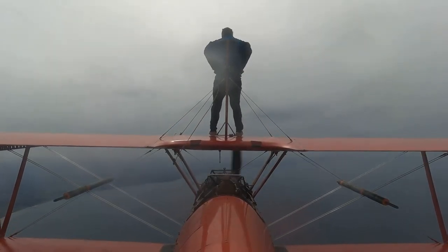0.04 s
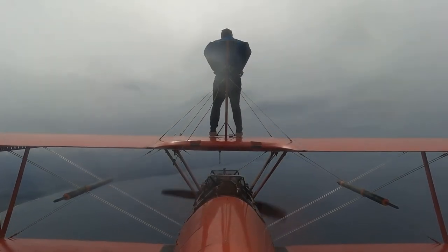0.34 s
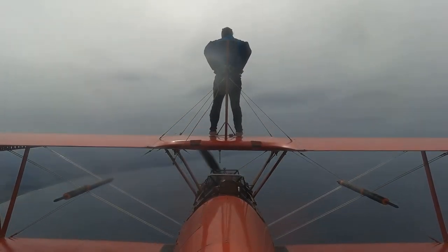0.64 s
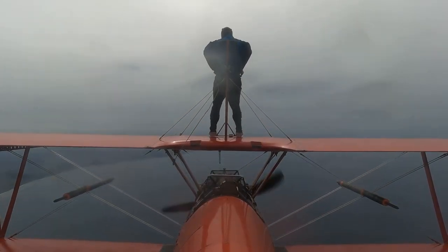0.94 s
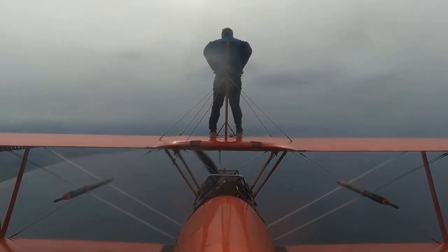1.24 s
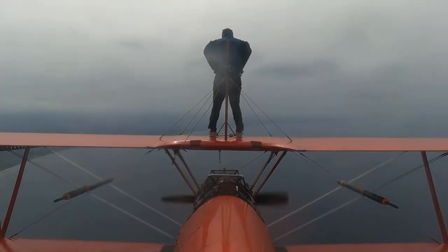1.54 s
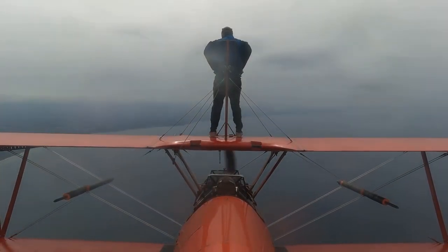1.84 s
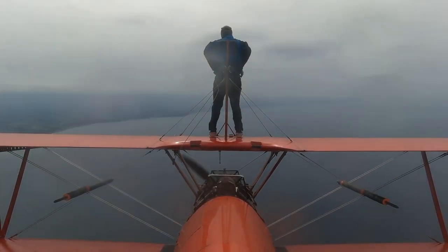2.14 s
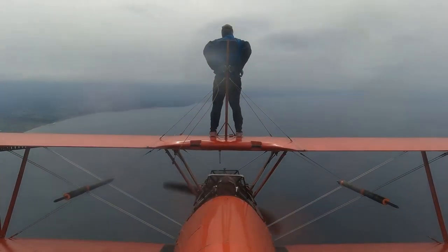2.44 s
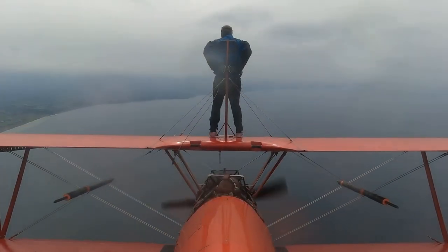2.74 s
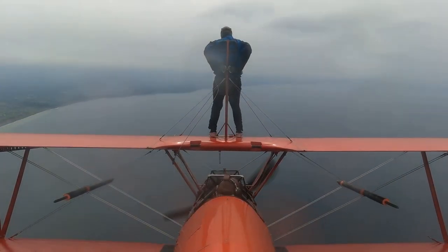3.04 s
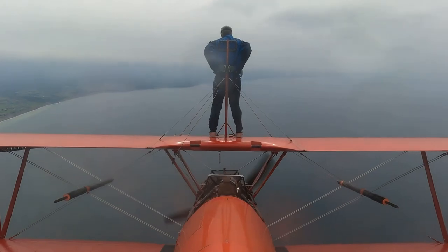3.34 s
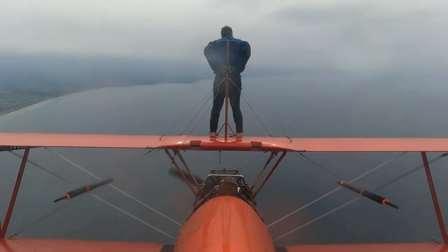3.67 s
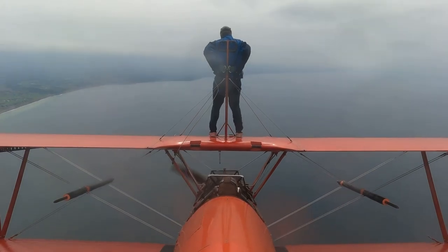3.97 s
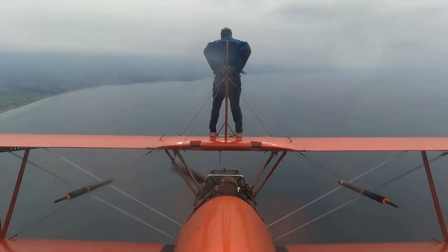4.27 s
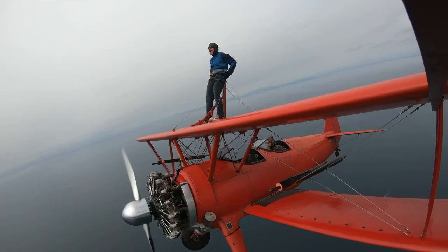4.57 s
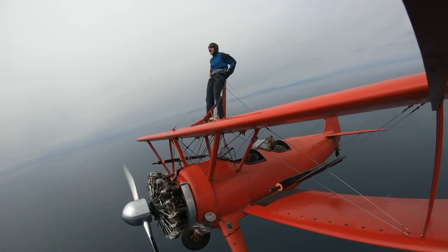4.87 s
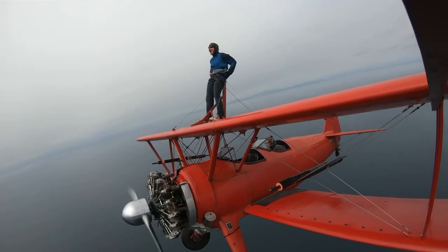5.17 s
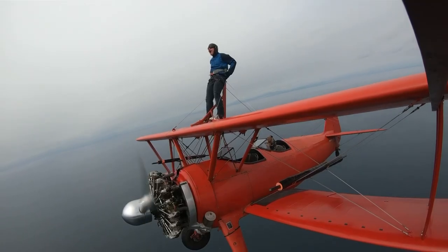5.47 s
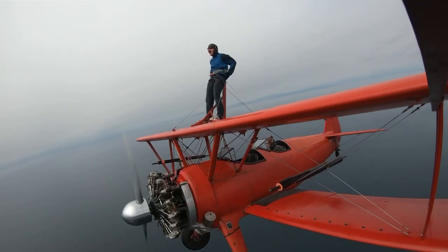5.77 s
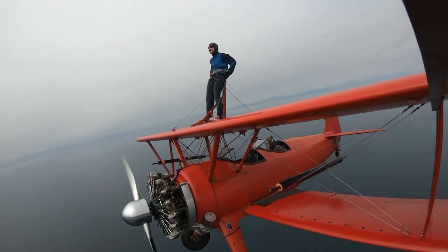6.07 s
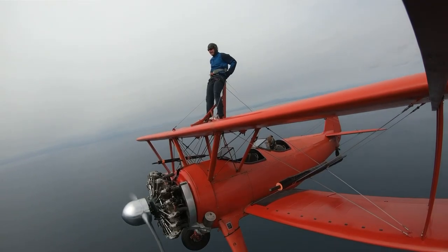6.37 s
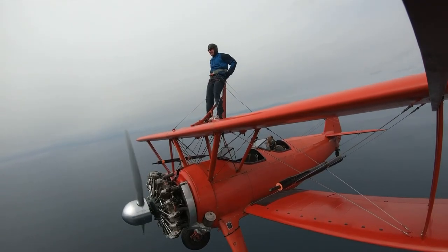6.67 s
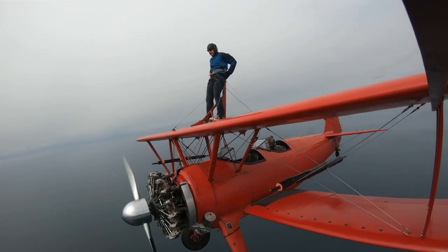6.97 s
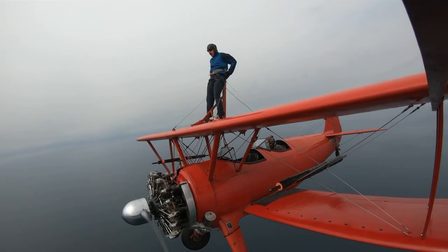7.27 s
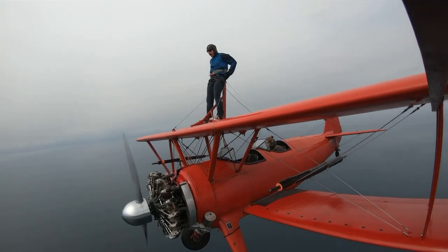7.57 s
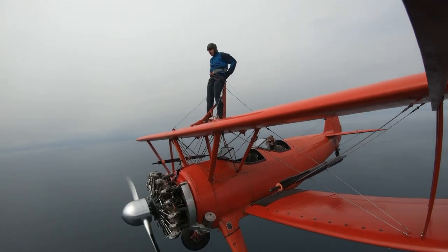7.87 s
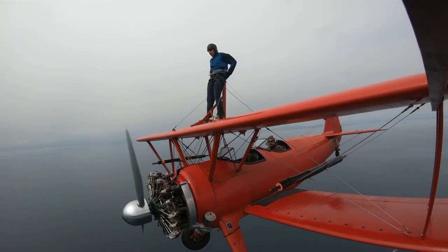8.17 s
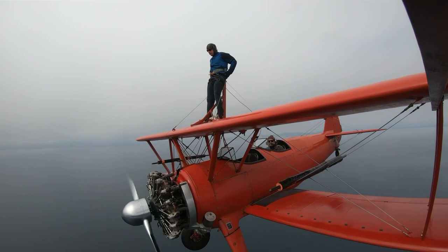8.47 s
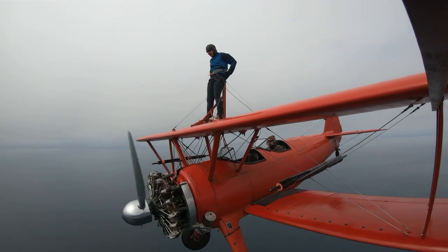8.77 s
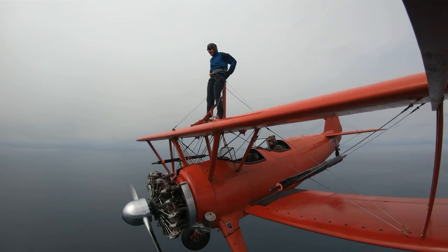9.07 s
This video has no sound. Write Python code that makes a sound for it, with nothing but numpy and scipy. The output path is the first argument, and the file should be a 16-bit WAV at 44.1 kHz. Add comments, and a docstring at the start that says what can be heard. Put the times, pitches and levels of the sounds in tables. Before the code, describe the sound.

Wind buffets the microphone on a flying propeller plane, then the propeller's raspy drone comes through clearly over rushing air.

```python
"""A radial-engined biplane's two-blade propeller in cruise, heard from two mounts in turn.
Behind the engine, slipstream turbulence batters the microphone and all but buries the blades.
After a short silent cut, out on the wing, the blades rasp cleanly and gain a little speed
over the throb of unequal cylinders, rushing air and a few gusts."""
import sys
import numpy as np
from scipy import signal
from scipy.fft import rfft, irfft, next_fast_len
from scipy.io import wavfile
from scipy.ndimage import uniform_filter1d, minimum_filter1d

SR = 44100
rng = np.random.default_rng(int(sys.argv[2]) if len(sys.argv) > 2 else 0)


def wav_record(signal):
    """Record a signal, one row per channel, as 16-bit PCM in the file named by sys.argv[1]."""
    frames = np.transpose(np.atleast_2d(signal))
    bounded = np.clip(frames, -1, 1)
    # unit amplitude maps onto the largest positive 16-bit level
    quanta = np.round(bounded * 32767).astype(np.int16)
    wavfile.write(sys.argv[1], SR, quanta)


N = 411011
TIME = np.arange(N) / SR
CUT_OUT_S, CUT_IN_S, SKIP_S = 4.3618, 4.3885, 4.8247


def from_db(db):
    """Decibels to gain."""
    return 10 ** (np.asarray(db) / 20)


def unit_rms(x):
    """Scale to unit power."""
    return x / np.sqrt(np.mean(x ** 2) + 1e-20)


def in_time(curve):
    """Breakpoint curve at every sample."""
    return np.interp(TIME, *np.transpose(curve))


def on_log_axis(points, where):
    """Spectrum interpolated over log frequency."""
    place, value = np.transpose(points)
    return np.interp(np.log(where), np.log(place), value)


def drift(rate_hz):
    """Smooth random wander, unit RMS."""
    hop, settle = 20, 4000
    pole = np.exp(-2 * np.pi * hop * rate_hz / SR)
    noise = rng.standard_normal(N // hop + settle + 2)
    slow = signal.lfilter([1], [1, -2 * pole, pole * pole], noise)[settle:]
    return np.interp(np.arange(N) / hop, np.arange(len(slow)), unit_rms(slow))


def band_noise(low_hz, high_hz, order=2):
    """Band-passed noise, unit RMS."""
    sos = signal.butter(order, [low_hz, high_hz], "band", fs=SR, output="sos")
    return unit_rms(signal.sosfilt(sos, rng.standard_normal(N)))


def turbulence(spectrum, swell_db):
    """Coloured noise in half-octave bands, each modulated by swell_db(hz)."""
    size = next_fast_len(N, real=True)
    hz = np.maximum(np.arange(size // 2 + 1) * SR / size, 1)
    bins = rfft(rng.standard_normal(size)) * from_db(on_log_axis(spectrum, hz)) * (hz > 10)
    half_octaves, out = 2 * np.log2(hz / 10), 0
    for band in range(23):
        share = np.maximum(1 - np.abs(half_octaves - band), 0)
        out += irfft(bins * share)[:N] * from_db(swell_db(10 * 2 ** (band / 2)))
    return out / np.std(irfft(bins))


# Slipstream spectrum: freq_hz, relative_density_db
SLIPSTREAM_SPECTRUM = [(15, -10), (35, -6.5), (70, 0.5), (125, -1), (250, -7), (500, -12.5), (900, -19.5),
                       (1400, -27), (2200, -35), (4000, -43), (6000, -59), (8200, -62), (10000, -73.5),
                       (13000, -90)]
# Strongest eddies' passing rate: time_s, rate_hz
EDDY_RATE = [(0.0, 76), (0.55, 59.7), (1.25, 113), (1.5, 108), (1.68, 189), (2.65, 180), (2.9, 80),
             (3.4, 72), (4.3, 125)]

def slipstream(passes, force_db, hiss_db, level_db=-19, eddy_db=2.5, eddy_octaves=0.27):
    """Eddies roll in the bass; the treble surges and tears, lightly chopped by the blades."""
    eddy_hz = in_time(EDDY_RATE)
    tear_db = 3.5 * drift(250) + 0.9 * drift(25) - 0.5 * np.cos(2 * np.pi * passes)

    def swell_db(hz):
        rough = hz / (hz + 700)
        treble = hz ** 2 / (hz ** 2 + 2200 ** 2)
        eddy_peak = np.exp(-.5 * (np.log2(hz / eddy_hz) / eddy_octaves) ** 2)
        roll_db = eddy_db * (eddy_peak - 0.25 * (1 - rough))
        surge_db = treble * hiss_db + (1 - treble) * force_db * hz / (hz + 150)
        return roll_db + surge_db + rough * tear_db + 0.78 * drift(65)

    return from_db(level_db) * turbulence(SLIPSTREAM_SPECTRUM, swell_db)


def crackle(hiss_db, base_per_s=380, spread_db=3, decay_s=0.00056, level_db=-56):
    """Tiny vortices tick at the microphone port, more often in a strong stream."""
    onsets = rng.random(N) < base_per_s * from_db(2 * hiss_db) / SR
    sizes = from_db(spread_db * np.minimum(rng.exponential(1, N), 3))
    envelope = signal.lfilter([1], [1, -np.exp(-1 / (decay_s * SR))], onsets * sizes + 1e-18)
    ticks = signal.lfilter([1], [1, -.8], envelope * rng.standard_normal(N))
    port = signal.butter(4, [2800, 6800], "band", fs=SR, output="sos")
    return from_db(level_db) * unit_rms(signal.sosfilt(port, ticks))


# Propeller speed: time_s, blade_rate_hz
BLADE_RATE = [(4.39, 66.98), (5.0, 67.22), (5.6, 67.44), (6.2, 67.64), (6.8, 67.78), (7.4, 67.85),
              (8.0, 68.17), (8.6, 68.53), (9.32, 69.08)]

def blade_passes(cut_in_passes=0.324, skip_passes=0.274, jitter_passes=0.00056):
    """Running count of blade passes; the beat skips ahead once."""
    count = np.cumsum(in_time(BLADE_RATE)) / SR
    count += cut_in_passes - np.interp(CUT_IN_S, TIME, count)
    return count + skip_passes * (TIME > SKIP_S) + jitter_passes * drift(30)


# Blade pulse spectrum: harmonic, relative_db
BLADE_SPECTRUM = [(1, -25.5), (2, -22.5), (3, -26.5), (4, -26), (5, -30.5), (6, -32), (7, -35), (10, -38),
                  (14, -43.5), (18, -48), (22, -55), (26, -64.5), (40, -67)]

def propeller(passes, edge_db, bass_harmonics=6, lag_hz=185, skew_rad=1.85):
    """Each blade sends a crack, then a slower suction; load sharpens the crack and thins the bass."""
    bass, crack = np.zeros((2, N))
    for k in range(1, round(BLADE_SPECTRUM[-1][0]) + 1):
        hz = k * BLADE_RATE[0][1]
        # all-pass phase: the bass trails the crack
        phase = 2 * np.arctan2(hz * lag_hz, hz ** 2 - lag_hz ** 2) - skew_rad
        gain = np.sqrt(2) * from_db(on_log_axis(BLADE_SPECTRUM, k))
        part = bass if k <= bass_harmonics else crack
        part += gain * np.cos(2 * np.pi * k * passes + phase)
    return bass * from_db(-0.61 * edge_db) + crack * from_db(edge_db + 0.02 * drift(25))


# Vortex bursts: peak_s, decay_s, relative_db
VORTEX_BURSTS = [(0.3781, 0.0028, -26), (0.695, .015, -32), (1.045, .035, -39), (1.54, 0.0029, -27),
                 (1.7165, .025, -33), (1.976, .005, -29), (2.2384, 0.008, -28), (2.7741, 0.0027, -28),
                 (3.4685, .0025, -27), (3.9051, 0.0055, -28), (4.195, 0.037, -35)]

def spits(gain_db=-11.5, attack_ratio=0.19):
    """Larger vortices burst at the port: sharp onset, short hiss."""
    envelope = 0
    for peak_s, decay_s, db in VORTEX_BURSTS:
        away_s = np.maximum(TIME - peak_s, (peak_s - TIME) / attack_ratio)
        envelope += from_db(db + gain_db) * np.exp(-away_s / decay_s)
    return envelope * band_noise(1800, 6200, order=4)


# Slipstream force: time_s, relative_db
STREAM_FORCE = [(0.0, 0.5), (0.4, 0.3), (1.5, 0.7), (2.1, -1.1), (2.55, 0.4), (3.6, 0), (4.3, 0.7)]

def behind_the_engine(passes, propeller_db=-12):
    """Slipstream and port noise over a faint propeller."""
    force_db = in_time(STREAM_FORCE)
    hiss_db = 1.1 * force_db + drift(14)
    wind = slipstream(passes, force_db, hiss_db) + spits() + crackle(hiss_db)
    return wind + from_db(propeller_db) * propeller(passes, edge_db=0)


def blade_hiss(passes, flow_db, base_db=-38, width_passes=0.017, delay_passes=0.036):
    """A puff of tip turbulence follows each crack, louder from one of the two blades."""
    offset = (passes - delay_passes + .5) % 1 - .5
    puff = np.exp(-.5 * (offset / width_passes) ** 2)
    imbalance_db = -np.cos(np.pi * passes)
    return from_db(base_db + flow_db + imbalance_db) * puff * band_noise(1700, 3630)


# Exhaust partials: cycle_harmonic, level_db
EXHAUST_PARTIALS = [(2, -53.5), (3, -50), (5, -48), (6, -48), (7, -41), (9, -44), (10, -48), (11, -39),
                    (13, -46), (14, -44.5), (17, -48.5), (31, -54)]

def exhaust(passes, waver_db=2, wander_rad=0.083):
    """Unequal cylinders repeat each four-stroke cycle: two shaft turns, four blade passes."""
    out = 0
    for harmonic, db in EXHAUST_PARTIALS:
        phase = 2 * np.pi * (harmonic * passes / 4 + rng.random()) + wander_rad * drift(1.6)
        out += np.sqrt(2) * from_db(db + waver_db * drift(2)) * np.sin(phase)
    return out


# Wing air spectrum: freq_hz, relative_density_db
AIR_SPECTRUM = [(20, -15.5), (50, -1.5), (110, 1), (220, -0.5), (450, -11), (1100, -14), (1800, -21.5),
                (2800, -25), (3700, -31), (5500, -36), (8400, -41), (9400, -48), (11000, -51), (15000, -77)]

def wing_air(flow_db, base_db=-31, flicker_db=0.7, bright_hz=700, rumble_loss=0.069):
    """Air rushes past the wing; faster flow trades rumble for hiss."""
    def swell_db(hz):
        tilt = (1 + rumble_loss) * hz / (hz + bright_hz) - rumble_loss
        return flow_db * tilt + flicker_db * drift(11)

    return from_db(base_db) * turbulence(AIR_SPECTRUM, swell_db)


def sizzle(start_db=-70.5, fade_db_per_s=6):
    """Thin top-end hiss, fading steadily."""
    level_db = start_db - fade_db_per_s * np.maximum(TIME - CUT_IN_S, 0)
    return from_db(level_db) * band_noise(11000, 13600)


# Wing gusts: peak_s, sigma_s, centre_hz, level_db
WING_GUSTS = [(4.84, 0.15, 127, -30), (4.98, 0.23, 310, -33), (5.25, 0.29, 110, -35.5),
              (5.32, 0.087, 352, -38), (5.607, 0.13, 172, -27.5), (5.845, 0.081, 128, -24.5),
              (6.417, 0.18, 358, -36), (9.29, 0.12, 174, -25.5)]

def gusts(edge_ratio=1.21):
    """Passing eddies rumble briefly on the microphone."""
    out = 0
    for peak_s, sigma_s, hz, db in WING_GUSTS:
        envelope = from_db(db) * np.exp(-.5 * ((TIME - peak_s) / sigma_s) ** 2)
        out += envelope * band_noise(hz / edge_ratio, hz * edge_ratio, order=3)
    return out


def skip_tick(gain_db=-36, decay_s=0.00006, low_hz=3000):
    """Faint, dry tick where the beat skips."""
    pulse = np.exp(-np.abs(TIME - SKIP_S) / decay_s) * (TIME > SKIP_S)
    highpass = signal.butter(1, low_hz, "high", fs=SR, output="sos")
    return from_db(gain_db) * signal.sosfilt(highpass, pulse)


# Airflow as the plane gathers speed: time_s, relative_db
WING_FLOW = [(4.4, -6), (5.2, -4.6), (6.5, -2), (7.2, -2), (8.0, 0), (9.3, 1.5)]

def on_the_wing(passes):
    """Propeller and exhaust in the open; faster air sharpens the blades."""
    flow_db = in_time(WING_FLOW)
    air = wing_air(flow_db) + sizzle()
    blades = propeller(passes, edge_db=1.07 + 0.29 * flow_db) + blade_hiss(passes, flow_db)
    return blades + exhaust(passes) + air + gusts() + skip_tick()


def limiter(x, ceiling_db, release_db_per_s):
    """Gain drops within milliseconds above the ceiling and recovers at a steady rate."""
    level_db = 10 * np.log10(np.abs(uniform_filter1d(x ** 2, size=100)) + 1e-12)
    over_db = np.maximum(level_db - ceiling_db, 0)
    ramp_db = release_db_per_s * TIME
    held_db = np.maximum.accumulate(over_db + ramp_db) - ramp_db
    gain_db = uniform_filter1d(minimum_filter1d(-held_db, size=130), size=130)
    return x * from_db(gain_db)


def scene(fade_s=0.0004):
    """Engine mount, brief silence, wing mount; one limiter each."""
    passes = blade_passes()
    engine = limiter(behind_the_engine(passes), ceiling_db=-13.5, release_db_per_s=231)
    wing = limiter(on_the_wing(passes), ceiling_db=-12.5, release_db_per_s=111)
    fade_out = np.clip((CUT_OUT_S - TIME) / fade_s, 0, 1)
    return (engine * fade_out + wing * (TIME > CUT_IN_S))[None]


def record(dry, stop_hz=15500):
    """Steep low-pass."""
    return signal.sosfilt(signal.cheby2(12, 70, stop_hz, fs=SR, output="sos"), dry)


dry = scene()
out = record(dry)
wav_record(out)
```